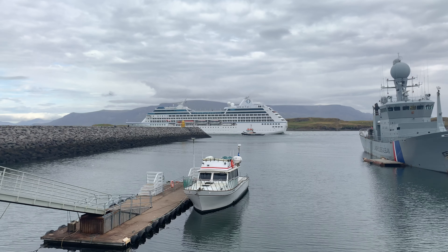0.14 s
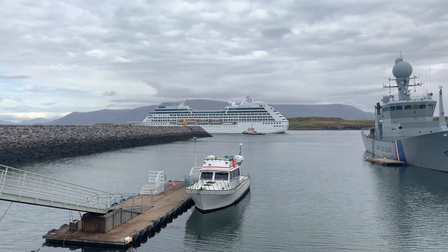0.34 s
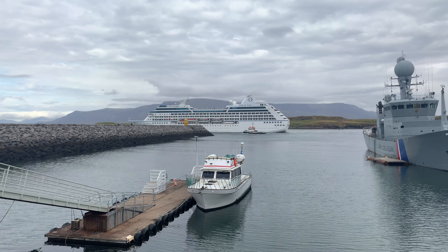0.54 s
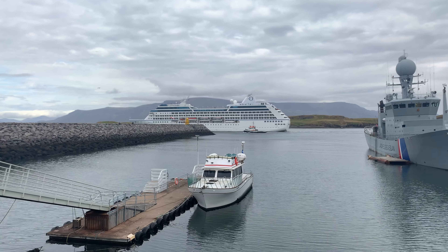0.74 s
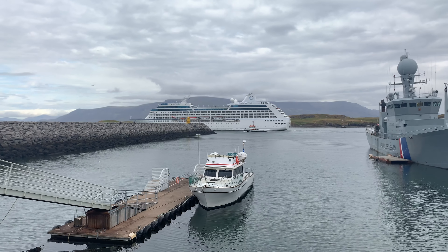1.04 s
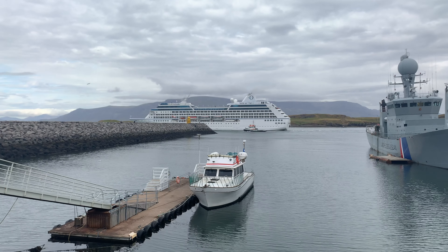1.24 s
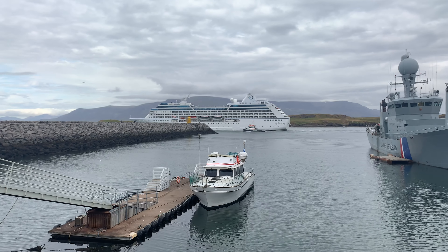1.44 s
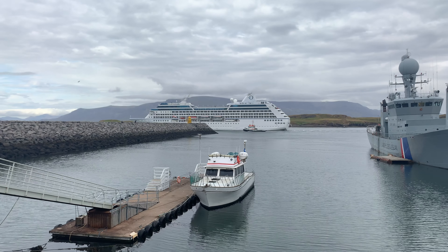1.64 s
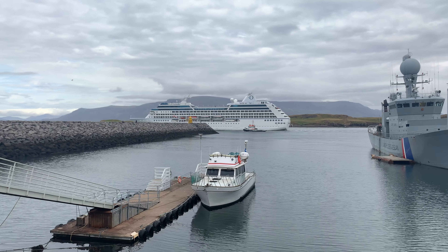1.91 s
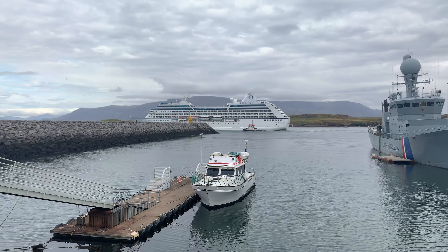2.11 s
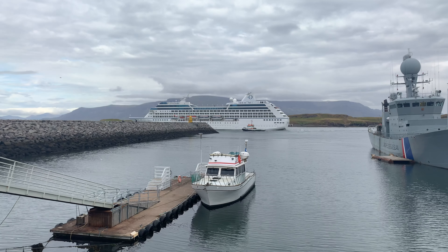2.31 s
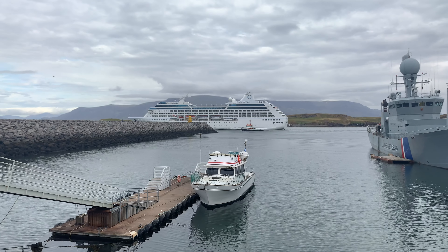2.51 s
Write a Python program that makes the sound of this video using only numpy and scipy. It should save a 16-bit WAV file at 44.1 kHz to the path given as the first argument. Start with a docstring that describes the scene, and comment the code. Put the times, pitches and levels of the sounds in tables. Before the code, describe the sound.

Light wind buffets the microphone in low thumps over a calm harbour's faint wash.

```python
"""Light wind buffets the microphone ports in low thumps over the distant wash of a calm harbour.
The wind is lumpy low noise plus eddies, each a short pressure swing of falling pitch.
A hoarse cry, a stack of harmonics, dies away at the start. Cloth slides near the right port
with a grainy hiss, a thin sizzle follows a hard thump, and near the end a far gull calls:
a falling whistle with a faint echo off the quay."""
import sys
import numpy as np
from scipy import signal
from scipy.fft import rfft, irfft, next_fast_len
from scipy.io import wavfile
from scipy.ndimage import uniform_filter1d, map_coordinates

SR = 44100
rng = np.random.default_rng(int(sys.argv[2]) if len(sys.argv) > 2 else 0)


def store_pcm(level_fs):
    """Save levels as 16-bit WAV."""
    pcm = np.round(np.clip(level_fs, -1, 1) * 32767).astype(np.int16)
    wavfile.write(sys.argv[1], SR, np.atleast_2d(pcm).T)


N = 117306

# Wind at the two ports. Each row: frequency in Hz, left-right correlation.
PORT_CORRELATION = [(30, 0.87), (120, 0.85), (300, 1), (500, 0.97), (900, 0.82)]


def amp(db):
    return 10 ** (np.asarray(db) / 20)


def unit(x):
    return x / np.sqrt(np.mean(x ** 2) + 1e-20)


def sides(db, pan_db):
    """Left and right level in dB; positive pan is left."""
    return (db + np.array([pan_db, -pan_db]) / 2)[..., None]


def along(points, hz):
    """Interpolate (Hz, value) points on a log axis."""
    knots_hz, values = np.transpose(points)
    return np.interp(np.log(hz + 1), np.log(knots_hz + 1), values)


def curves(rows):
    """One value per sample for each column after the time."""
    time_s, *columns = np.transpose(rows)
    return [np.interp(np.arange(N) / SR, time_s, column) for column in columns]


def wobble(rate_hz):
    """Smooth random curve, rate_hz knots a second."""
    knots = rng.standard_normal(int(N * rate_hz / SR) + 4)
    return map_coordinates(knots, [np.arange(N) * rate_hz / SR])


def filtered(x, response):
    """Apply a complex frequency response."""
    size = next_fast_len(N + SR // 2)
    return irfft(rfft(x, size) * response(np.fft.rfftfreq(size, 1 / SR)), size)[..., :N]


def lagged(pair, lag_s):
    """Left arrives lag_s after right."""
    return filtered(pair, lambda hz: np.exp(-1j * np.pi * hz * lag_s * np.array([[1], [-1]])))


def noise(spectrum, correlation, patchy_db):
    """Stereo noise of rms 1 with time-frequency patches of random gain."""
    bins = signal.stft(rng.standard_normal((2, N)), nperseg=512)[2]
    patches = uniform_filter1d(uniform_filter1d(rng.standard_normal(bins.shape[1:]), 6, 0), 10, 1)
    pair = signal.istft(bins * amp(patchy_db * unit(patches)), nperseg=512)[1][:, :N]
    spectrum = [(spectrum[0][0] / 2, -120), *spectrum, (spectrum[-1][0] * 1.3, -120)]

    def mid_side_gains(hz):
        angle = np.arccos(np.clip(along(correlation, hz), -1, 1)) / 2
        return amp(along(spectrum, hz)) * [np.cos(angle), np.sin(angle)]

    mid, side = filtered(pair, mid_side_gains)
    return unit(np.array([mid + side, mid - side]))


def pressure_swings(start_s, sides_db, start_hz):
    """Each eddy crossing the ports is a short pressure swing, suction first, sliding down in pitch."""
    rise_s, t60_s, spread_rad = 0.0026, 0.037, 0.76
    halving_cycles = 1.633  # periods of start_hz until the pitch has halved
    t = np.arange(SR // 16) / SR
    start_rad = np.pi + spread_rad * rng.standard_normal((len(start_s), 1))
    cycles = halving_cycles * np.log1p(t * start_hz[:, None] / halving_cycles)
    rise = np.sin(np.pi / 2 * np.clip(t / rise_s, 0, 1)) ** 2
    swings = np.sin(start_rad + 2 * np.pi * cycles) * amp(sides_db - 60 * t / t60_s) * rise
    at = np.round(start_s * SR).astype(int)[:, None] + np.arange(len(t))
    return np.array([np.bincount(at.ravel(), side.ravel(), N + SR)[:N] for side in swings])


def small_eddies(per_s=110, centre_hz=440):
    """Eddies of random time, size, pitch and side."""
    when, size, pitch, pan = rng.random((int(per_s * N / SR), 4)).T
    size_db = 1.5 - 1.5 * np.log(size + 0.019)
    return pressure_swings(when * N / SR, sides(size_db, 4 * (pan - .5)), centre_hz * (.5 + pitch))


def wind_buffeting():
    """Wind on the ports: rumble, flutter and rasp surge in shared lumps; eddies ride the flutter."""
    # Band envelopes. Each row: time in s, then rumble, flutter and rasp in relative dB.
    levels = [(0.0, -32.5, -53, -44), (0.03, -19, -32.5, -55.5), (0.06, -32, -39, -51),
              (0.11, -23.5, -33.5, -52.5), (0.17, -19, -29, -42.5), (0.19, -31, -37.5, -45.5),
              (0.23, -17.5, -24.5, -41), (0.25, -29, -40, -67), (0.27, -23.5, -30.5, -37),
              (0.32, -21.5, -30, -56.5), (0.38, -25, -27, -45), (0.45, -32, -41, -50),
              (0.47, -27.5, -31.5, -46.5), (0.66, -31, -43.5, -60), (0.72, -20.5, -37.5, -53),
              (0.77, -41.5, -51, -59), (0.79, -30, -26, -59.5), (0.87, -32, -38.5, -60),
              (0.9, -22.5, -27.5, -37.5), (0.93, -12, -14.5, -29), (0.98, -22, -32, -46.5),
              (1.03, -23.5, -37, -49.5), (1.05, -28, -27.5, -38), (1.07, -18.5, -15, -37),
              (1.11, -29.5, -29.5, -54), (1.13, -18, -21, -36.5), (1.17, -29, -27, -48),
              (1.21, -19.5, -30.5, -42), (1.28, -25, -24.5, -34), (1.36, -30, -34, -57),
              (1.61, -37, -51.5, -59), (1.72, -33.5, -46, -53), (1.76, -25, -30, -62),
              (1.8, -25, -34.5, -42), (1.82, -22, -34.5, -49.5), (1.9, -25.5, -36, -54.5),
              (1.94, -29, -44, -55), (1.97, -27, -33.5, -53), (2.03, -34.5, -51.5, -54),
              (2.21, -37.5, -51, -57), (2.24, -29, -35.5, -64), (2.27, -32, -50, -61),
              (2.45, -42, -49, -75), (2.47, -42, -38.5, -66), (2.66, -32.5, -52, -49)]
    # Band spectra. Each row: frequency in Hz, relative density in dB.
    rumble_spectrum = [(35, -27.5), (55, 1), (80, 5), (200, -9), (260, -33.5), (440, -120)]
    flutter_spectrum = [(60, -35.5), (130, 0), (250, -5), (400, -14), (550, -25), (800, -50.5)]
    rasp_spectrum = [(300, -22), (450, 3), (700, -7.5), (1000, -17.5), (1600, -33), (2200, -54)]
    rumble_db, flutter_db, rasp_db = curves(levels)
    lumps_db = 2.4 * wobble(40) + 2.3 * wobble(110)
    rumble_gain = amp(1.1 * wobble(16) + 0.69 * lumps_db)
    rumble = unit(rumble_gain * noise(rumble_spectrum, PORT_CORRELATION, patchy_db=0.72))
    flutter = unit(amp(lumps_db) * noise(flutter_spectrum, PORT_CORRELATION, patchy_db=1.0))
    rasp_gain = amp(lumps_db + 3.2 * wobble(200))
    rasp = unit(rasp_gain * noise(rasp_spectrum, PORT_CORRELATION, patchy_db=0.5))
    flutter += amp(-7.5) * small_eddies()
    return amp(rumble_db - 2.5) * rumble + amp(flutter_db - 4) * flutter + amp(rasp_db - 4.5) * rasp


def wind_heave():
    """The deepest wind, swelling and sinking around 45 Hz."""
    # Envelope. Each row: time in s, level in dB.
    levels = [(0.0, -49.5), (0.01, -38), (0.35, -28), (0.73, -37), (0.97, -21.5), (1.03, -33.5),
              (1.07, -24), (1.18, -36), (1.22, -22.5), (1.25, -35.5), (1.52, -34), (1.53, -38),
              (1.79, -29.5), (1.82, -46), (1.85, -27.5), (1.96, -24), (2.04, -39.5), (2.24, -30),
              (2.36, -39.5), (2.39, -31.5), (2.44, -36), (2.49, -25.5), (2.52, -31.5), (2.55, -59),
              (2.63, -32.5), (2.66, -46)]
    # Spectrum. Each row: frequency in Hz, relative density in dB.
    spectrum = [(15, -30.5), (25, -7.5), (45, 3), (60, -2.5), (80, -24.5)]
    return amp(curves(levels)[0]) * noise(spectrum, PORT_CORRELATION, patchy_db=0.1)


def harbour():
    """A far wash of engines, water and air."""
    # Envelopes. Each row: time in s, then hum and air in relative dB.
    levels = [(0.0, -57.5, -68), (0.18, -58, -65.5), (0.64, -58.5, -69.5), (1.29, -59.5, -69),
              (1.51, -55.5, -66), (1.7, -56.5, -66), (2.04, -58, -68.5), (2.41, -58, -69.5),
              (2.64, -58.5, -69.5)]
    # Spectra. Each row: frequency in Hz, relative density in dB.
    hum_spectrum = [(200, -5.5), (320, -14.5), (500, -16.5), (700, -25), (1200, -20.5), (1800, -28),
                    (2100, -35), (2800, -35.5)]
    air_spectrum = [(1500, -8), (2200, 1.5), (2700, -0.5), (3500, 3.5), (4500, 1), (5300, -5.5),
                    (5900, -29), (7000, -29.5)]
    # Stereo width. Each row: frequency in Hz, left-right correlation.
    correlation = [(200, 1), (500, 0.65), (1000, 0.12), (2000, 0.36), (4000, 0.47), (6500, .5),
                   (9000, 0.21), (14000, 0.27)]
    hum_db, air_db = curves(levels)
    hum = amp(hum_db + 9 + .6 * wobble(3.3)) * noise(hum_spectrum, correlation, patchy_db=2.0)
    air = amp(air_db + 4.5 + 0.21 * wobble(4.7)) * noise(air_spectrum, correlation, patchy_db=1.5)
    return lagged(hum + air, lag_s=.0001)


def squawk():
    """The dying end of a low, hoarse cry: a sagging stack of harmonics, slightly left."""
    # Contour. Each row: time in s, fundamental in Hz, gain in dB.
    contour = [(0, 452, 0), (.018, 436, 0), (.034, 421, -1), (.046, 414, -5), (.06, 405, -30)]
    # Throat tone. Each row: harmonic number, relative level in dB.
    harmonics = [(3, -60), (4, -67), (5, -78), (7, -67), (8, -78)]
    pitch_hz, gain_db = curves(contour)
    phase = 2 * np.pi * np.cumsum(pitch_hz * (1 + .006 * wobble(200))) / SR
    fade = amp(gain_db) * (np.arange(N) / SR < contour[-1][0])
    stack = sum(amp(db + 3 + 3 * wobble(70)) * np.sin(k * phase) for k, db in harmonics)
    return fade * stack * amp(sides(0, pan_db=3))


def wind_thumps():
    """Strong eddies hit the ports; sharper ones start at a higher pitch."""
    # Each row: start in s, relative level in dB, sharpness in dB, left over right in dB.
    thumps = [(0.032, -35, -20.5, 2), (0.09, -27.5, -24, 1), (0.114, -13, -29.5, 0), (0.125, -14, -29, 2.5),
              (0.139, -25, -26, -0.5), (0.157, -16, -34, 0), (0.165, -24.5, -21.5, -2),
              (0.178, -25, -31, -3), (0.198, -26, -25.5, -2), (0.208, -22, -25.5, -6), (0.222, -14, -28, 3),
              (0.271, -24.5, -15, 0), (0.295, -30.5, -20, -4), (0.34, -27.5, -22.5, 1),
              (0.372, -20.5, -23, 2.5), (0.469, -33.5, -16.5, -5), (0.481, -28, -10, 1.5),
              (0.53, -34, -26.5, 0), (0.705, -31, -21, 1), (0.792, -18.5, -25, -1),
              (0.853, -19, -26.5, 0.5), (0.88, -32, -14, 2.5), (0.896, -15, -20.5, -0.5),
              (0.917, -20, -10.5, -4.5), (0.927, -10, -10, 1), (0.932, -10.5, -35.5, 0),
              (0.944, -20, -16, -2), (1.023, -26, -23, 1), (1.011, -14, -36, 1), (1.047, -22, -20, 4),
              (1.064, -14, -36.5, 2), (1.074, -8.5, -24, 1), (1.085, -13.5, -25, -3),
              (1.092, -14.5, -30, 0), (1.129, -15, -19, 1), (1.15, -13.5, -29.5, 0.5),
              (1.173, -23.5, -19.5, -5.5), (1.186, -25, -22, 10), (1.222, -17, -24, 2),
              (1.236, -27, -16, -6.5), (1.265, -12, -22.5, 0.5), (1.278, -23, -14.5, 3),
              (1.294, -22.5, -19, 0.5), (1.323, -15.5, -28.5, -0.5), (1.43, -27.5, -20.5, 0),
              (1.733, -27.5, -26.5, -1), (1.746, -14.5, -33, -1), (1.757, -24, -26, -3),
              (1.769, -20, -28.5, -1), (1.796, -13.5, -24.5, 0), (1.802, -20.5, -35.5, -1),
              (1.822, -18, -32.5, 0), (1.832, -28, -20, -0.5), (1.842, -21.5, -35, -2.5),
              (1.867, -23, -35.5, 0), (1.898, -19.5, -35.5, -1), (1.961, -33, -17.5, 1.5),
              (1.965, -19.5, -31, 0), (2.007, -31, -24, 0), (2.2, -23, -36, -1), (2.223, -17.5, -31.5, 1),
              (2.24, -19.5, -29.5, -3), (2.248, -13.5, -32.5, 1)]
    dull_hz, dull_db, octaves_per_db = 588, -22, 0.1835
    start_s, level_db, sharp_db, pan_db = np.transpose(thumps)
    start_hz = dull_hz * 2 ** (octaves_per_db * (sharp_db - dull_db))
    swings = pressure_swings(start_s + 0.00152, sides(level_db + 1.5, pan_db), start_hz)
    return lagged(swings, lag_s=0.00018)


def cloth():
    """Fabric slides close by: a fine grainy hiss, mostly right, over a duller body."""
    # Envelopes. Each row: time in s, then hiss and body in relative dB.
    levels = [(0.0, -89, -91), (0.2, -90.5, -82), (0.26, -77, -72), (0.3, -83.5, -71.5), (0.39, -82.5, -75),
              (0.44, -89.5, -91.5), (0.45, -89.5, -78), (0.53, -88, -88), (0.86, -92.5, -81),
              (0.91, -88, -85), (0.93, -82, -77.5), (0.97, -77.5, -74), (1.0, -88.5, -80.5),
              (1.33, -91.5, -92), (1.39, -81.5, -85), (1.41, -80.5, -78), (1.52, -76, -78.5),
              (1.66, -67, -62.5), (1.72, -71.5, -62), (1.84, -87, -76.5), (1.87, -96, -77),
              (2.01, -85.5, -78), (2.2, -76, -69), (2.34, -76.5, -76), (2.5, -89, -86), (2.63, -83.5, -78)]
    # Spectra. Each row: frequency in Hz, relative density in dB.
    hiss_spectrum = [(7000, -32), (8000, 0.5), (9000, -2.5), (10500, -8), (12000, -21.5), (14000, -20.5),
                     (15000, -28.5)]
    body_spectrum = [(2500, -11), (3500, 8.5), (5000, 3.5), (6500, 7), (8000, -8), (9500, -7.5),
                     (12000, -19), (14500, -27.5)]
    hiss_db, body_db = curves(levels)
    grain = amp(1.3 * wobble(400) + .7 * wobble(29.66))
    hiss = unit(grain * noise(hiss_spectrum, correlation=[(8000, 0.18)], patchy_db=-1.0))
    body = unit(grain * noise(body_spectrum, correlation=[(4000, 0.36)], patchy_db=2.0))
    hiss *= amp(sides(0, pan_db=-11))
    return amp(hiss_db) * hiss + amp(body_db + 2.0) * lagged(body, lag_s=.0001)


def sizzle(start_s=.93, length_s=0.059, level_db=-77.5):
    """Thin, bright, centred noise swells and fades after a hard thump."""
    # Spectrum. Each row: frequency in Hz, relative density in dB.
    spectrum = [(7000, -19), (9000, -1), (10500, -1.5), (11500, -13), (13500, -4), (15000, -8)]
    swell = np.sin(np.pi * np.clip((np.arange(N) / SR - start_s) / length_s, 0, 1))
    return amp(level_db) * swell * noise(spectrum, correlation=[(10000, .85)], patchy_db=5.0)


def gull():
    """A far gull, louder on the left: a thin falling whistle with a second harmonic and an echo."""
    # Each row: start in s, relative level in dB, second harmonic over fundamental in dB.
    calls = [(2.39, -54.5, -20.5)]
    # Contour. Each row: time into the call in s, pitch in Hz, gain in dB, second-harmonic boost in dB.
    contour = [(-.008, 1790, -40, 3), (0, 1815, -5, -1), (.008, 1841, 4.5, 7), (.024, 1902, 1, 11),
               (.034, 1920, -1.5, -16), (.052, 1915, 2.5, -5), (0.075, 1800, 3, -12), (.108, 1641, 9, -24),
               (.124, 1547, 8.5, -22), (.133, 1450, 0, -20), (.144, 1340, -40, -20)]
    knots_s, pitch_hz, gain_db, shrill_db = np.transpose(contour)
    cry = np.zeros(N)
    for start_s, level_db, second_db in calls:
        t = np.arange(N) / SR - start_s
        hz = np.interp(t, knots_s, pitch_hz) * (1 + 0.00067 * wobble(130))
        phase = 2 * np.pi * np.cumsum(hz) / SR
        envelope = amp(level_db + 6 + np.interp(t, knots_s, gain_db, -120, -120) + 0.69 * wobble(59.4))
        second = amp(second_db + np.interp(t, knots_s, shrill_db)) * np.sin(2 * phase)
        cry += envelope * (np.sin(phase) + second)
    return lagged(cry * amp(sides(0, pan_db=6)), lag_s=0.00039) + quay_echo(cry)


def quay_echo(cry, level_db=-18, t60_s=0.19):
    """Faint, diffuse reflection off the quay."""
    t = np.arange(SR // 3) / SR
    tail = rng.standard_normal((2, len(t))) * amp(-60 * t / t60_s)
    tail /= np.linalg.norm(tail[0])
    return amp(level_db) * signal.fftconvolve(cry[None], tail, axes=1)[:, :N]


def scene():
    wind = wind_buffeting() + wind_heave() + wind_thumps()
    return wind + harbour() + cloth() + sizzle() + gull() + squawk()


def record(dry):
    """The microphones add a faint hiss of their own; nothing passes above the band limit."""
    # Self-noise spectrum. Each row: frequency in Hz, relative density in dB.
    spectrum = [(4500, -6.5), (6000, 5.5), (7500, -9.5), (10000, -5), (12000, -9), (14500, -7)]
    hiss_db, top_hz = -82.5, 15100
    hiss = amp(hiss_db) * noise(spectrum, correlation=[(8000, 0.11)], patchy_db=3.0)
    return filtered(dry + hiss, lambda hz: hz < top_hz)


dry = scene()
out = record(dry)
store_pcm(out)
```